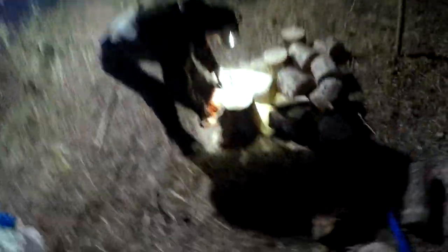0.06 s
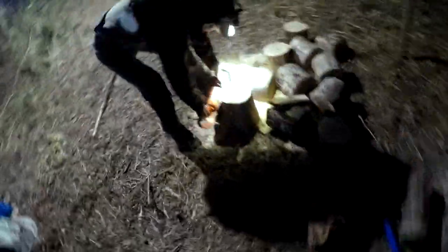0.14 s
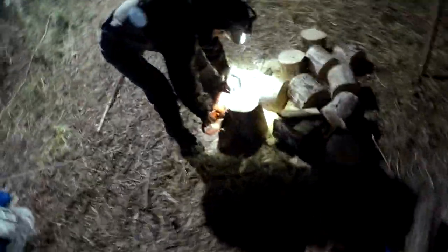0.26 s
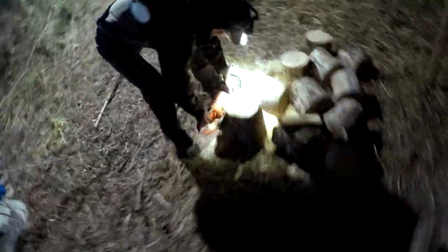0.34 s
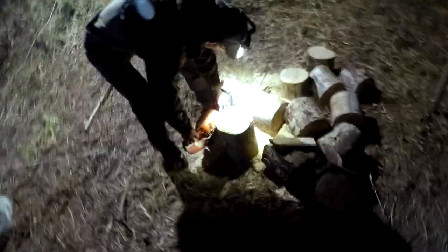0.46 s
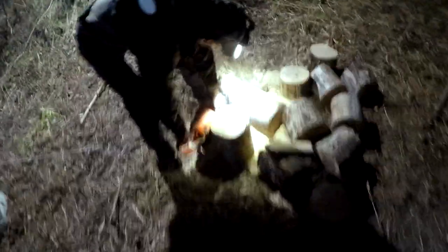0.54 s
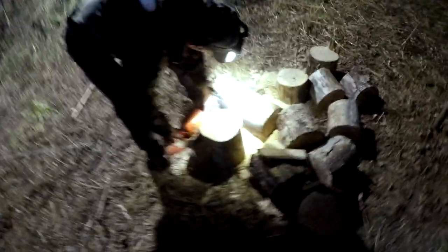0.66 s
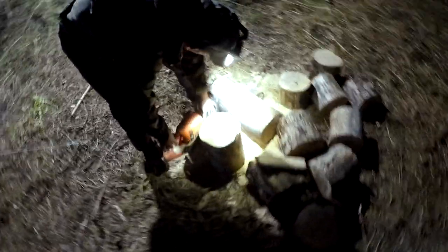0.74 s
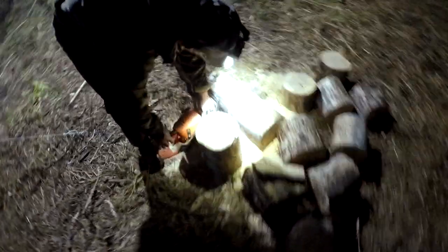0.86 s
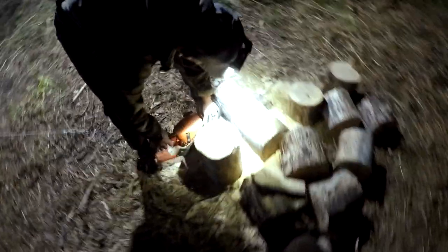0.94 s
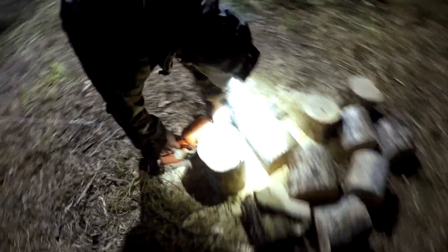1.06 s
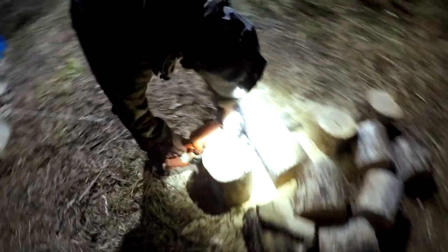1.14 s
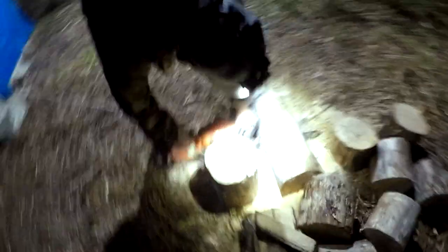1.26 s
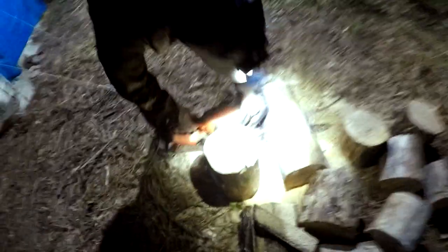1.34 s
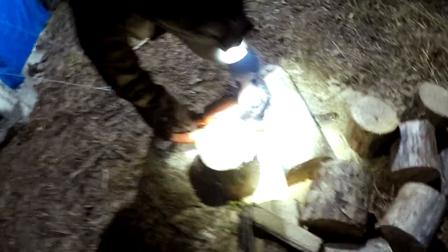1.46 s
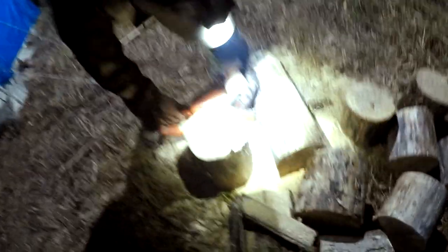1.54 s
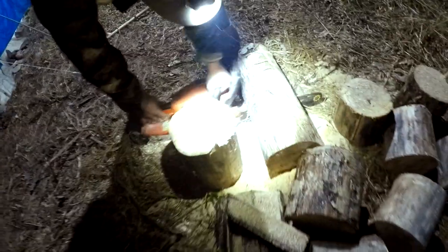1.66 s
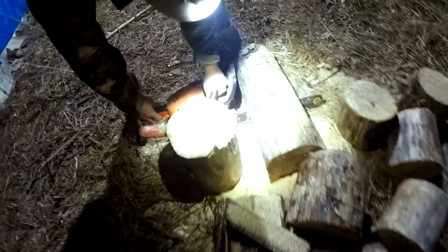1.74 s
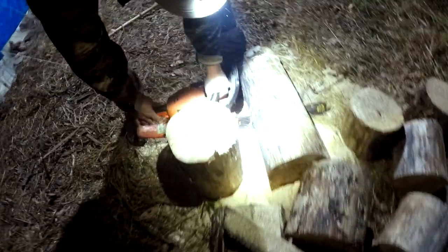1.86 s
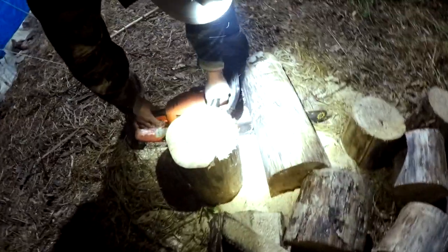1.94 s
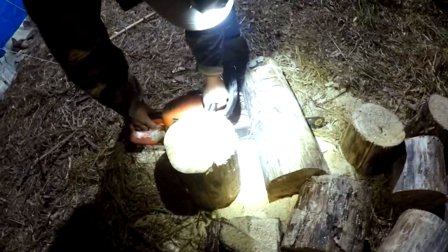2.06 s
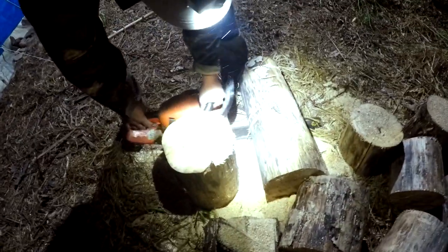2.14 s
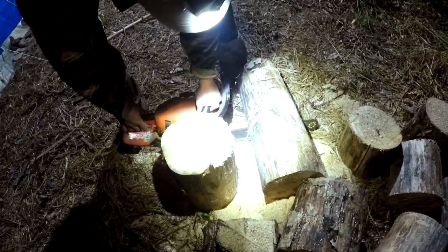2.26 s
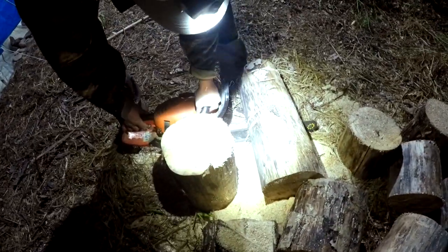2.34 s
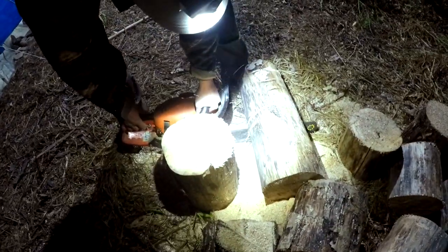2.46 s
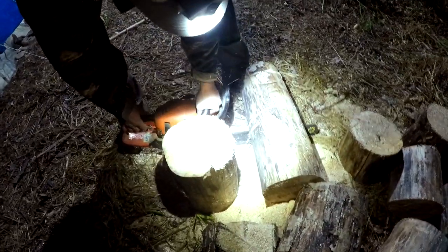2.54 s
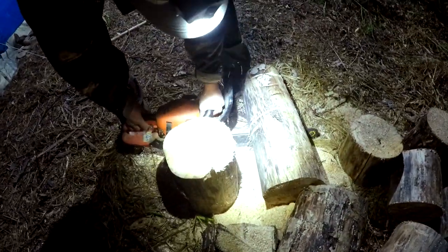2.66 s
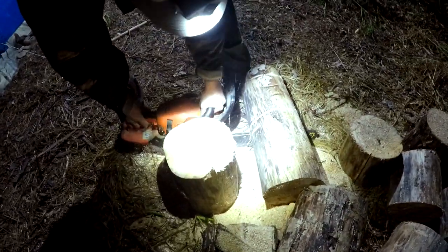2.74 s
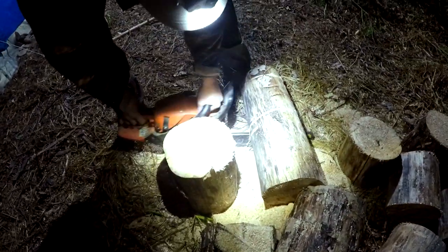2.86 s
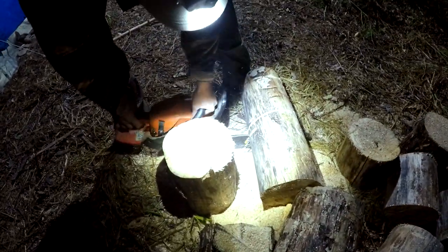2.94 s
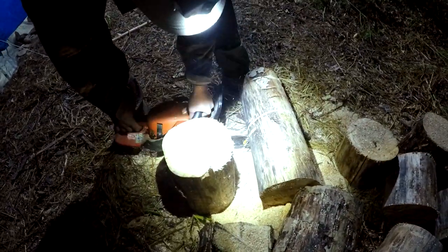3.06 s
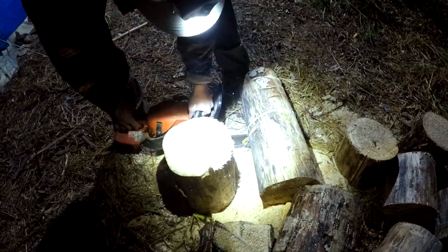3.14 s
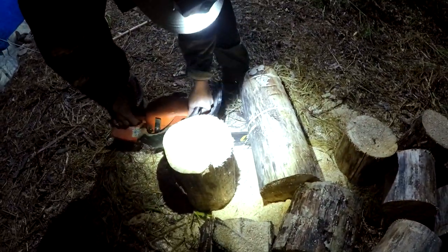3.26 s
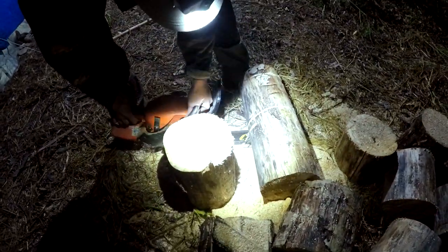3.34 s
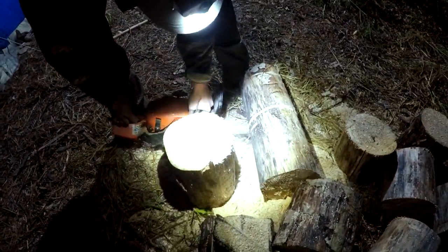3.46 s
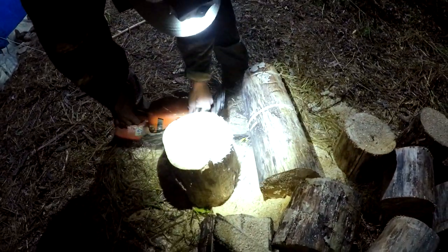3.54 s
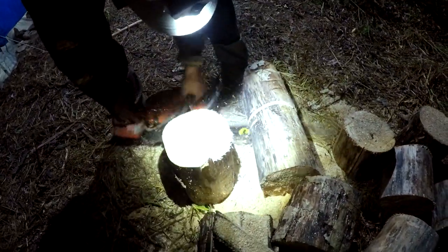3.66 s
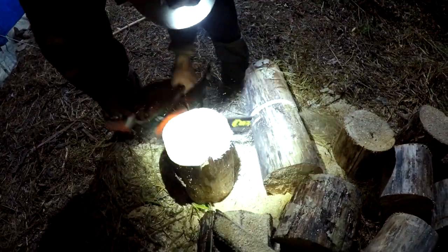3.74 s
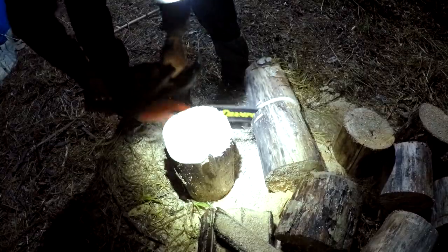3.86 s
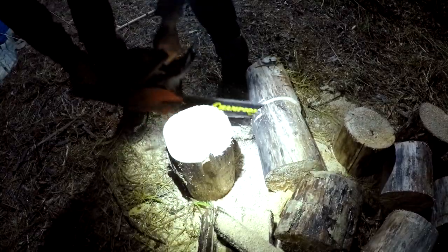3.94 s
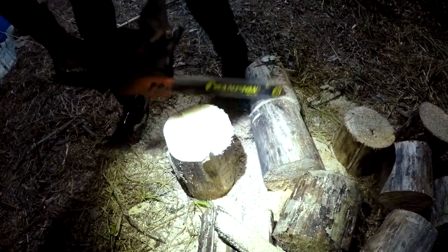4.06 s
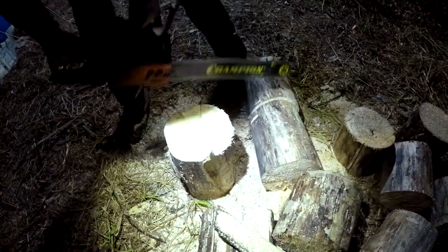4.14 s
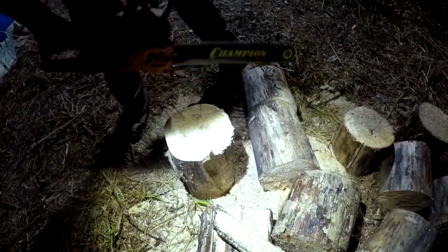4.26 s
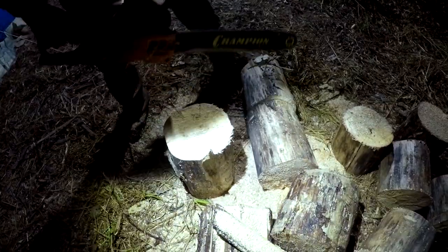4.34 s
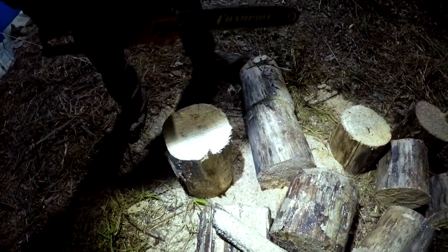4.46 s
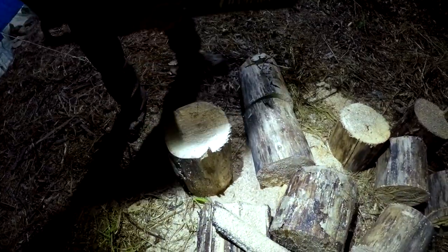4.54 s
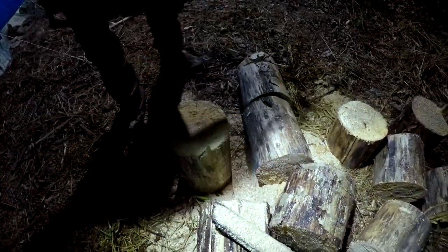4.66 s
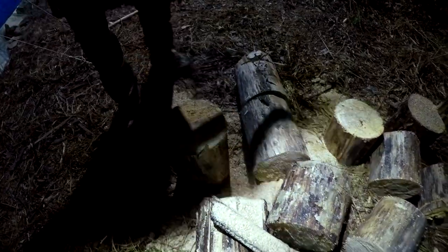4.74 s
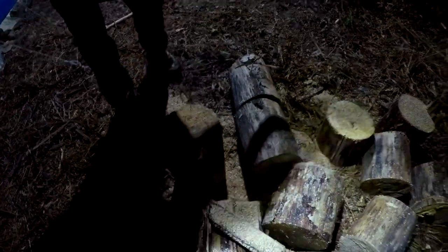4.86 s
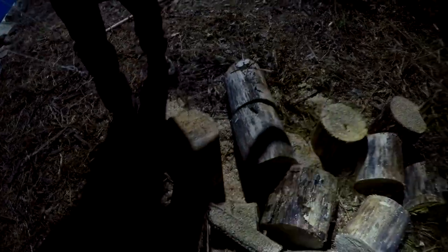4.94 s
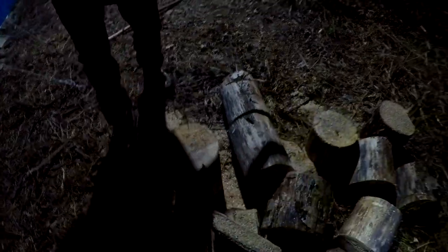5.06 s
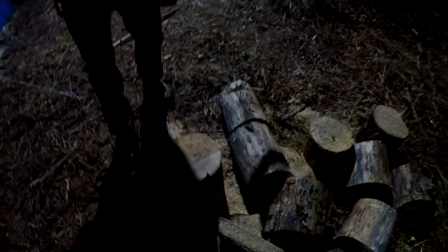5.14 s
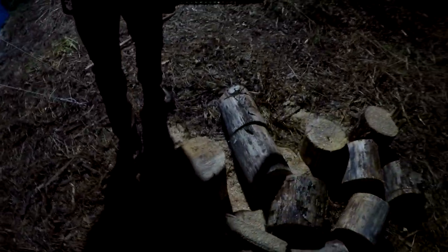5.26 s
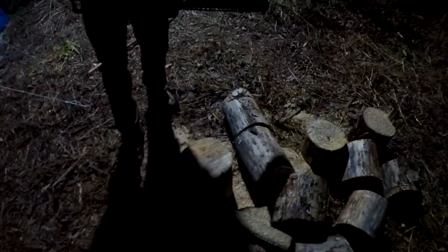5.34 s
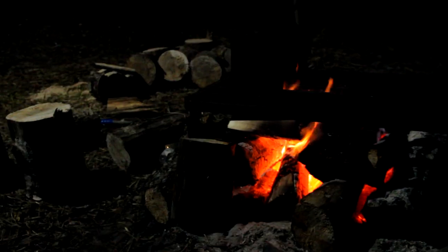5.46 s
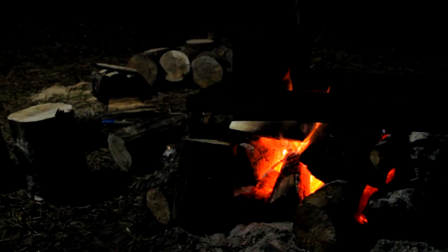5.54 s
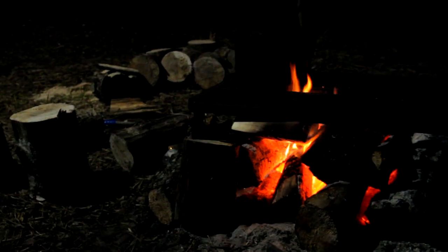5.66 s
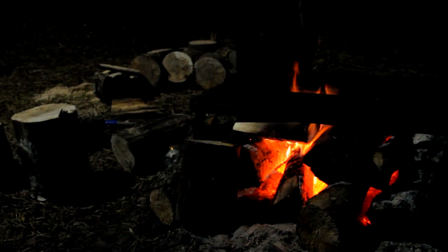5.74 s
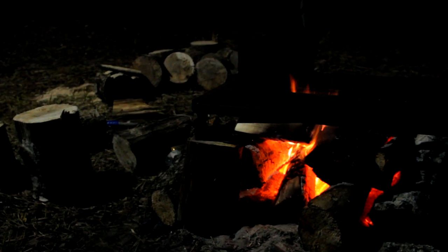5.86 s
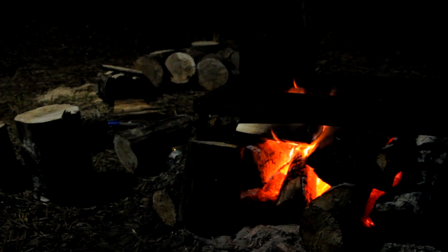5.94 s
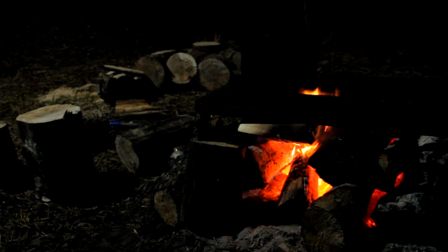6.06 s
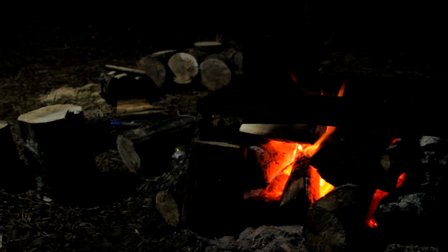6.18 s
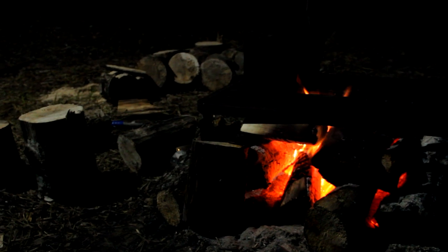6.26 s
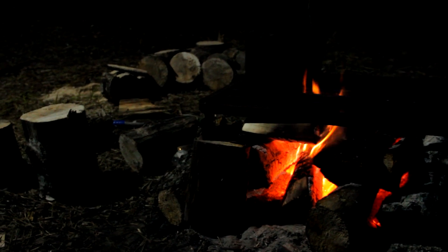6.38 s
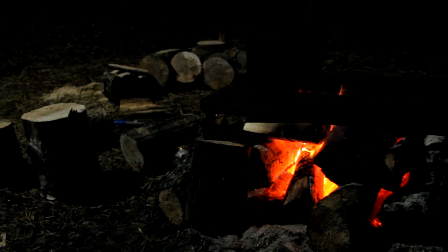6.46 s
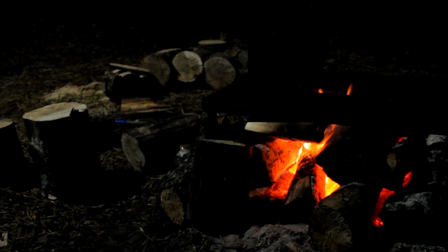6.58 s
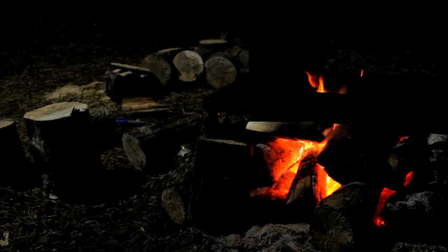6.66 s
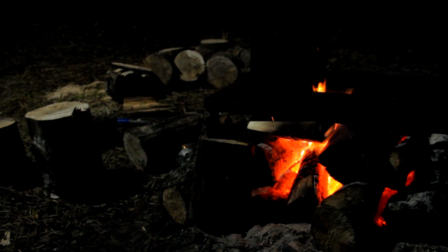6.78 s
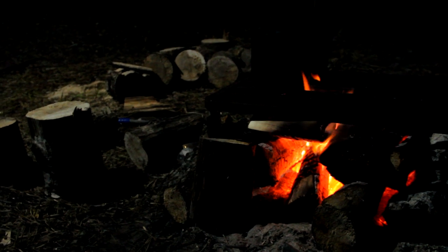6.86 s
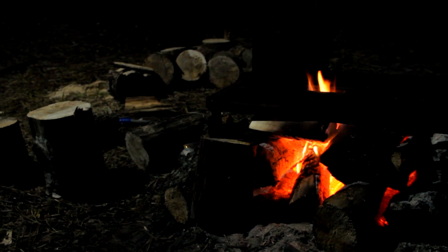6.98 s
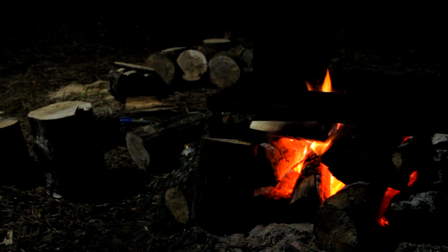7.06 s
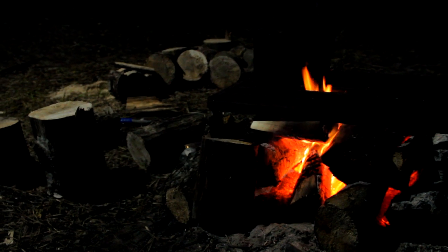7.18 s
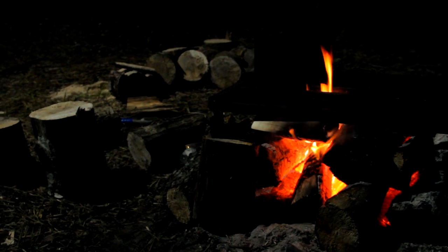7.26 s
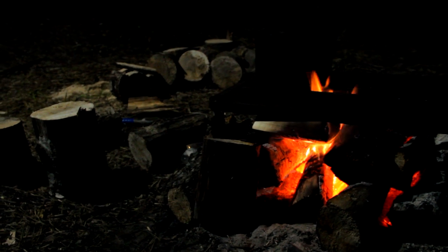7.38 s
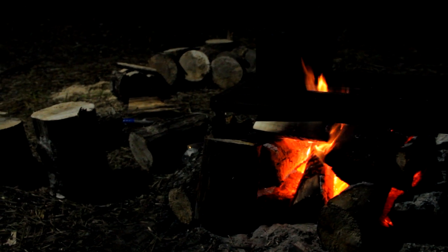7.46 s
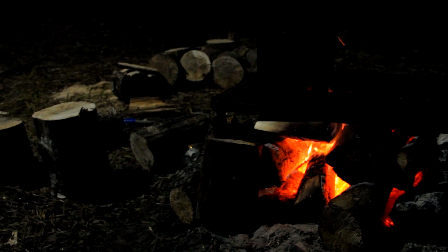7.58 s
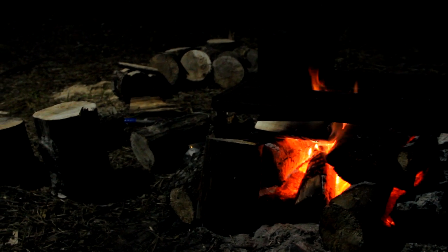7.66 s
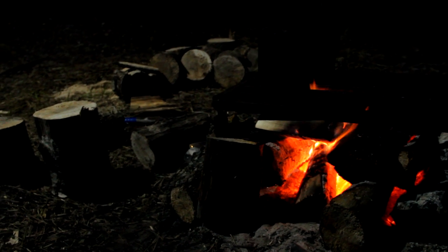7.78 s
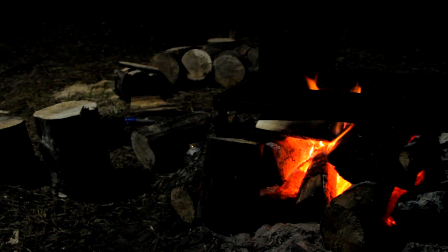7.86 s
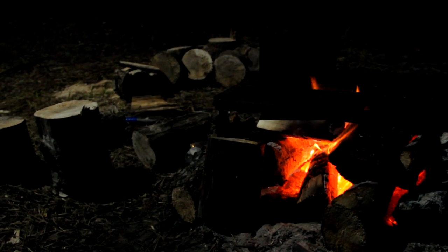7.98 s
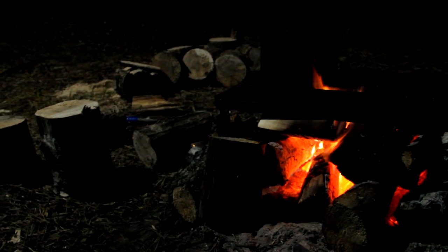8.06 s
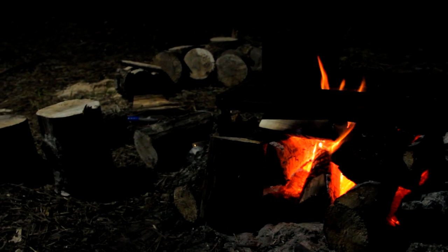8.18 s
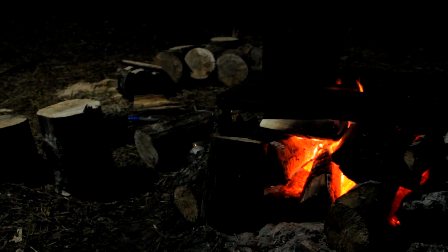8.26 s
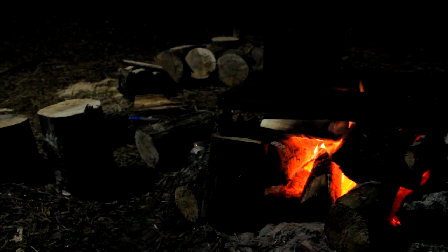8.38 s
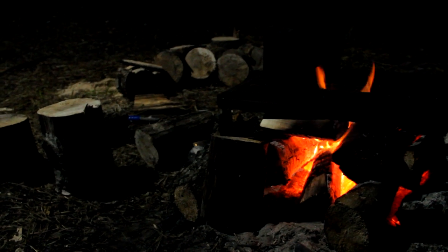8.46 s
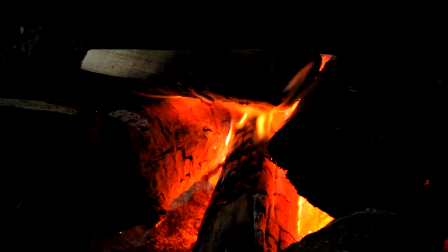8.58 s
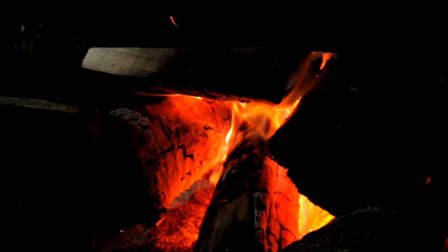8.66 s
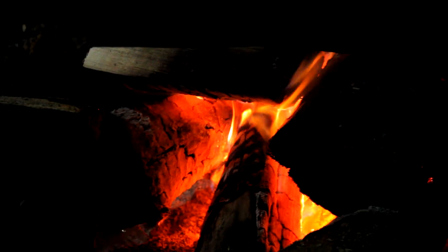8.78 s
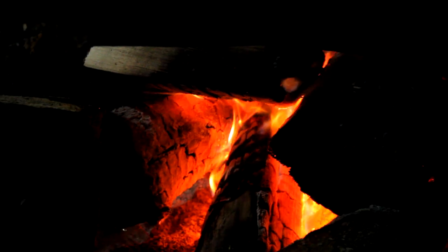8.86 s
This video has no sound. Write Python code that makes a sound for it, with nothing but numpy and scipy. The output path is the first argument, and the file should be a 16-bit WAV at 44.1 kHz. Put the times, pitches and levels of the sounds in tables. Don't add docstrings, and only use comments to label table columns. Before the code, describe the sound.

Loud two-stroke saw wavering under load, lifted and coasting down in pops and metallic rattles, then abruptly a hushed night hiss, low hum and few fire snaps.

```python
import sys
import numpy as np
from scipy import signal
from scipy.io import wavfile
from scipy.ndimage import uniform_filter1d

SR = 44100
rng = np.random.default_rng(int(sys.argv[2]) if len(sys.argv) > 2 else 0)


def invert_db(x):
    u = np.asarray(x, float) / 20
    return 10 ** u


def unload_audio(sound):
    columns = np.transpose(np.atleast_2d(sound))
    steps = np.round(np.clip(columns, -1, 1) * 32767)
    wavfile.write(sys.argv[1], SR, steps.astype(np.int16))


N = 393319

# time in seconds, crank turns in Hz.
CUTTING = [(0.0, 129.6), (0.1, 135.9), (0.23, 130.7), (0.42, 143.8), (0.55, 139.5), (0.75, 149.3),
           (1.06, 137.2), (1.2, 137.4), (1.38, 125.7), (1.75, 140.7), (1.96, 152.5), (2.15, 154.1),
           (2.51, 142.8), (2.74, 127.1), (2.92, 137.6), (3.19, 132.6), (3.37, 122.5), (3.55, 110.9)]
# time in seconds, crank turns in Hz.
LIFTED = [
    (3.62, 121),
    (3.7, 99.97),
    (3.75, 93.5),
    (3.88, 89.84),
    (4.11, 102.8),
    (4.58, 35.51),
]
# time in seconds, peak in dB.
MISSES = [
    (0.234, -22),
    (0.374, -29),
    (0.536, -21),
    (0.679, -18),
    (0.727, -16),
    (0.969, -13),
    (1.059, -31),
    (1.234, -21),
    (1.329, -28),
]
# frequency in Hz, level in dB.
MUFFLER = [(250, -8), (400, -9), (520, -4.5), (670, 0.5), (800, -8.5), (950, -15), (1070, -6.5),
           (1300, -16), (1700, -19.5), (2000, -23), (2600, -17), (3400, -59)]
# frequency in Hz, level in dB.
MUFFLER_FAR = [(250, 2.5), (450, -9), (650, -5), (800, -3), (1000, 1.5), (1150, -4.5), (1350, -10.5),
               (1700, -20), (2600, -8), (3400, -32)]
# frequency in Hz, level in dB.
MUFFLER_FREE = [(60, -17), (120, 7), (250, 0.5), (400, -2), (550, -2.5), (690, 4.5), (850, -9.5),
                (1000, -12), (1250, -7), (1500, -16.5), (2600, -21), (3400, -34)]
# frequency in Hz, change in dB.
THROTTLE_OPEN = [(200, 0.5), (330, -8.5), (470, 7), (580, 1.5), (720, -6), (1000, 3), (1300, 1.5)]
PORTS_DB = {3: -8, 4: 3, 6: 3, 7: 1, 8: 4}
# frequency in Hz, density in dB per Hz.
METAL = [(760, -27.5), (1300, 1.5), (1430, -8), (1650, -5), (1770, -8), (2010, -7), (2570, -2),
         (2910, -6.5), (3500, -9.5), (4120, -2.5), (5060, -4.5), (5490, 0.5), (6040, 0.5), (6510, -4),
         (7600, -22.5), (9880, -44), (16700, -120)]
# frequency in Hz, density in dB per Hz.
METAL_FREE = [(760, -24), (1300, 1), (1580, -30.5), (1800, -3), (2600, -3), (3130, -13.5), (3370, -6.5),
              (3680, -12), (4000, -1.5), (4670, 1), (5530, -0.5), (6370, -0.5), (7600, -20.5),
              (9880, -50.5), (16700, -120)]
# frequency in Hz, density in dB per Hz.
SHIMMER = [(4120, -25), (7000, -10), (7590, -13), (8310, -1.5), (8760, -2.5), (11200, -20), (12200, -7),
           (12800, -2.5), (14700, -16), (15600, -14)]
# frequency in Hz, density in dB per Hz.
RUMBLE = [(20, -15), (60, -1), (200, 2.5), (400, 0), (1000, 4), (1600, -25)]
# time in seconds, half length in seconds, level in dB.
GUSTS = [
    (0, .1, -21),
    (.47, 0.24, -24),
    (1.0, 0.36, -23),
    (1.53, .06, -36),
    (1.75, .08, -38),
    (2.86, .15, -44.5),
    (4.0, .25, -29.5),
    (4.48, .15, -31),
]
# time in seconds, peak in dB, ring centre in Hz, length in seconds.
CLANKS = [(4.5837, 14.5, 6340, 0.0036), (4.6168, 4, 6400, 0.0087), (4.634, -12.5, 5200, 0.033),
          (4.665, 4, 5170, 0.0076), (4.7265, -15.5, 5940, 0.025), (4.741, -8, 5948, 0.0082),
          (4.7894, -33, 4260, 0.01), (4.8244, -9.5, 4960, 0.018), (4.851, -17, 6063, 0.021),
          (4.8687, -11, 6501, 0.017), (4.9044, -41, 4600, 0.01), (4.954, -17.5, 3958, 0.025),
          (4.994, -14, 5140, 0.0058), (5.016, -25, 4430, 0.02063), (5.146, -33, 4635, 0.0077),
          (5.428, -39, 6100, 0.01), (5.442, -26, 5470, 0.0083)]
# time in seconds, peak in dB.
POPS = [
    (4.588, 5.5),
    (4.626, 3),
    (4.681, 1.5),
    (4.739, -4),
    (4.829, -14),
    (4.87, -18.5),
    (4.959, -21),
]
# time in seconds, level in dB, frequency in Hz, 60 dB decay in seconds.
PINGS = [
    (4.884, -25, 4560, 0.11),
    (5.031, -34.5, 4510, 0.36),
    (4.511, -7.5, 2610, .04),
    (4.533, -13, 2610, .04),
    (4.558, -5, 2560, 0.053),
    (4.734, -14, 6040, 0.08),
    (4.862, -14, 6050, 0.055),
]
# frequency in Hz, density in dB per Hz.
YARD_WIND = [(12, -43), (20, 1), (54, -3.5), (154, -8), (178, -10.5), (233, -12.5), (455, -24.5),
             (1500, -36), (1950, -44), (3300, -120)]
# frequency in Hz, density in dB per Hz.
YARD_RUSTLE = [(760, -34), (1300, -5), (1770, -7), (2070, -12), (2300, -7), (3190, -17), (3840, -12),
               (4170, -5), (4820, -10), (6110, -4), (7590, -21), (9320, -17), (11200, -32), (12800, -25),
               (15300, -32)]
# time in seconds, half length in seconds, level in dB.
RUSTLES = [
    (4.7, .06, -28),
    (4.9, 0.13, -49),
    (5.44, 0.089, -45.5),
]
# order, level in dB.
DRONE = [(1, -56), (2, -46), (3, -38), (4, -53), (6, -39), (7, -49), (8, -43), (9, -48), (10, -57),
         (11, -56), (12, -59)]
# time in seconds, half length in seconds, level in dB.
SWELLS = [
    (5.5, .12, -40),
    (6.2, .24, -33.5),
    (6.85, 0.14, -36),
    (7.5, .1, -46),
    (8.23, 0.15, -34),
    (8.66, 0.0375, -45),
    (8.92, .12, -44),
]
# frequency in Hz, density in dB per Hz.
NIGHT = [(4.7, -46), (8.0, -14), (27, -15), (59, -4.5), (112, -2), (145, -5), (212, -8), (330, -11.5),
         (500, -15), (1070, -15), (1730, -21), (3260, -14.5), (5260, -26), (14500, -34.5), (16000, -30)]
# frequency in Hz, side relative to mid in dB.
NIGHT_SIDE = [(60, -59), (110, -60), (200, -42.5), (380, -18), (700, -18), (1290, -19.5), (2380, -20),
              (4400, -20), (8120, -3.5), (15000, -3)]
# time in seconds, peak in dB, centre in Hz.
TICKS = [
    (6.336, -27, 9430),
    (6.4078, -17, 8240),
    (6.4597, -25, 8410),
    (8.109, -27, 7470),
    (8.6797, -30, 6980),
]

# far dB, close dB, free at 100 Hz dB, free dB per octave of speed
FIRST_DB = (-7.5, -7, -13, 12)
SECOND_DB = (-17, -20, -17.5, 5)
FIFTH_DB = (-30, -17, -26.5, 5)
BARK_DB = (-19, -20, -12, 4)
CHAIN_DB = (-19, -17.5, -15, -1)
SHIMMER_DB = (-14.5, -15, -15.5, 1)
APPROACH_S = (.6, 1.1)
LIFT_S, JOLT_S, SHUT_S = 3.58, (3.72, 3.8), 4.1
RELEASE_S = .05
LUG_HZ = 122
RUMBLE_DB, CALM_DB = -25.5, -69
SAW_END_S = CLANKS[0][0]
YARD_S, CHANGE_S = 4.7, 5.463
NIGHT_DB = -38


def evened(x):
    return x / np.sqrt(np.mean(x ** 2) + 1e-20)


def read(points, hz):
    f, value = np.transpose(points)
    return np.interp(np.log(hz + 1), np.log(f + 1), value)


def add(mix, s, sound):
    part = mix[round(s * SR):][:len(sound)]
    part += sound[:len(part)]


def ramp(t, start, stop):
    return np.clip((t - start) / (stop - start), 0, 1)


def bumps(rows, t, floor_db):
    return invert_db(floor_db) + sum(invert_db(db) * np.exp(-((t - s) / half) ** 2) for s, half, db in rows)


def drift(length, count):
    return np.interp(np.linspace(0, count - 1, length), np.arange(count), rng.standard_normal(count)) * 1.35


def colour(x, points):
    hz = abs(np.fft.fftfreq(8192, 1 / SR))
    log_gain = np.log(invert_db(np.maximum(read(points, hz), -100)))
    response = np.fft.ifft(np.exp(np.conj(signal.hilbert(log_gain)))).real[:3000]
    return signal.oaconvolve(x, response)[:len(x)]


def resonate(x, hz, width):
    r = np.exp(-np.pi * width / SR)
    return 2 * signal.lfilter([1 - r], [1, -r * np.exp(2j * np.pi * hz / SR)], x).real


def patchy(points, length, patchy_db, flicker_db):
    real, imaginary, patches = rng.standard_normal((length // 128 + 5, 257, 3)).T
    flicker = evened(uniform_filter1d(patches[0], size=6))
    patches = uniform_filter1d(patches, size=3, axis=0)
    patches = evened(uniform_filter1d(patches, size=50, axis=1))
    z = (real + 1j * imaginary) * invert_db(patchy_db * patches + flicker_db * flicker)
    noise = signal.istft(z, nperseg=512, noverlap=384)[1][:length]
    return evened(colour(noise, points))


def stance(t):
    lift, shut = ramp(t, LIFT_S, LIFT_S + .06), ramp(t, SHUT_S, SHUT_S + .06)
    jolt = lift - ramp(t, *JOLT_S)
    settle = lift * np.exp(-np.maximum(t - JOLT_S[0], 0) / .14)
    rough = .15 + (.6 - .15) * settle
    rough += (.06 - rough) * shut
    return 1 - ramp(t, *APPROACH_S) + jolt / 2, lift - jolt / 2, rough


def level(row, t, hz, close_db=0):
    far_db, near_db, free_db, per_octave_db = row
    near, lift = ramp(t, *APPROACH_S), ramp(t, LIFT_S + 0.02, LIFT_S + 0.07)
    cutting = (1 - near) * far_db + near * (near_db + close_db)
    return (1 - lift) * cutting + lift * (free_db + per_octave_db * np.log2(hz / 100))


def uneven_firing(t):
    miss = sum(invert_db(db) * np.exp(-((t - s - .02) / 0.0095) ** 2) for s, db in MISSES)
    start, attack = 3.62, .08
    stutter = ramp(t, start, start + attack) ** 2 * (1 - ramp(t, SHUT_S, SHUT_S + RELEASE_S))
    stutter = np.sqrt(2) * stutter * invert_db(-15 - 18 * (t - start - attack))
    return miss, stutter


def crank_orders(t, hz, angle, miss, half):
    far, free, _ = stance(t)
    notch_db = -9 * np.exp(-((2 * hz - 250) / 12) ** 2)
    fifth_peak_db, sixth_peak_db = (-10 * np.log10(1 + ((k * hz - 655) / 68) ** 4) for k in (5, 6))
    first_db = level(FIRST_DB, t, hz) + .7 * drift(len(hz), count=50)
    second_db = level(SECOND_DB, t, hz, notch_db) + 1.6 * drift(len(hz), count=40)
    fifth_db = level(FIFTH_DB, t, hz, fifth_peak_db) + (.9 + 3 * (far + free)) * drift(len(hz), count=50)
    orders = invert_db(first_db) * np.cos(angle + 0.66)
    orders += invert_db(second_db) * np.cos(2 * angle + .5)
    orders += invert_db(fifth_db) * np.cos(5 * angle)
    close = np.clip(1 - 2 * (far + free), 0, 1)
    orders -= close * invert_db(FIFTH_DB[1] - 2.5 + sixth_peak_db) * np.cos(6 * angle)
    labour = np.clip((LUG_HZ - hz) / 10, 0, 1)
    orders -= close * labour * invert_db(-22) * np.cos(3 * angle)
    halves = miss * np.cos(angle / 2)
    halves += half * (np.cos(3 * angle / 2) + .5 * np.cos(5 * angle / 2))
    return np.sqrt(2) * orders + halves


def exhaust(hz, angle, uneven):
    far, free, rough = stance(np.arange(len(hz)) / SR)
    shares, pipes = (far, 1 - far - free, free), (MUFFLER_FAR, MUFFLER, MUFFLER_FREE)
    step = np.arange(0, len(hz), 100)
    throttle = free[step] * (1 - ramp(step / SR, SHUT_S, SHUT_S + .04))
    lines = np.zeros(len(hz))
    for k in [3, 4] + list(range(6, 34)) + list(np.arange(1.5, 14)):
        order_hz = k * hz[step]
        db = sum(share[step] * read(pipe, order_hz) for share, pipe in zip(shares, pipes))
        db += free[step] * PORTS_DB.get(k, 0) + 2.4 * drift(len(step), count=24)
        db += throttle * read(THROTTLE_OPEN, order_hz)
        size = invert_db(db) * (uneven[step] if k % 1 else 1)
        wave = -np.cos(k * angle + 0.8 * rng.standard_normal())
        lines += np.interp(np.arange(len(hz)), step, size) * wave
    lines /= np.sqrt(uniform_filter1d(lines ** 2, size=5000) + 1e-9)
    turn = angle / (2 * np.pi) % 1
    puffs = rng.standard_normal(len(hz)) * (.5 + np.exp(-turn / 0.4))
    puffs = sum(share * evened(colour(puffs, pipe)) for share, pipe in zip(shares, pipes))
    return np.sqrt(1 - rough) * lines + np.sqrt(rough) * puffs


def chain_noise(t, hz):
    free = stance(t)[1]
    chain = np.sqrt(1 - free) * patchy(METAL, len(hz), 1.9, .7)
    chain += np.sqrt(free) * patchy(METAL_FREE, len(hz), 1.3, .7)
    chain += invert_db(level(SHIMMER_DB, t, hz)) * patchy(SHIMMER, len(hz), 0.711, 0.99)
    lug_db = -2.5 * np.maximum(LUG_HZ - hz, 0) / 10
    return invert_db(level(CHAIN_DB, t, hz, lug_db)) * chain


def wind_and_steps(t):
    rumble = invert_db(RUMBLE_DB) * patchy(RUMBLE, len(t), 2.5, 1.5)
    thump = patchy([(10, -2), (30, -17), (80, 2), (200, -41)], len(t), 1.0, 1.39)
    return rumble + bumps(GUSTS, t, CALM_DB) * thump


def kerf_scrape(t):
    rasp = resonate(rng.standard_normal(len(t)), 1150, 500)
    rasp = evened(resonate(rasp, 1150, 500))
    return bumps([(3.685, .03, -17)], t, -120) * rasp


def saw():
    t = np.arange(round(SAW_END_S * SR)) / SR
    hz = np.interp(t, *np.transpose(CUTTING + LIFTED))
    turns = np.cumsum(hz * (1 + .003 * drift(len(hz), count=300))) / SR
    turns += 1000 - turns[-1]
    angle = 2 * np.pi * turns
    miss, stutter = uneven_firing(t)
    half = miss + stutter
    strength = 1 + 0.2 * np.interp(turns, np.arange(1001), rng.standard_normal(1001))
    bark = strength * exhaust(hz, angle, np.clip(0.08 + 5 * half, 0, .9))
    lug_db = 2 * np.maximum(LUG_HZ - hz, 0) / 10
    bark *= invert_db(level(BARK_DB, t, hz, lug_db) + 1.5 * ramp(t, SHUT_S, SHUT_S + RELEASE_S))
    pulsing = np.clip(np.maximum(0.21 + 1.7 * stutter, (72 - hz) / 42), 0, 1)
    gate = 1 - pulsing + 1.8176 * pulsing * strength * np.exp(-(turns % 1) / 0.49)
    out = crank_orders(t, hz, angle, miss, half) + bark
    out += gate * (chain_noise(t, hz) + kerf_scrape(t)) + wind_and_steps(t)
    return out * np.clip((SAW_END_S - t) / 0.005083, 0, 1)


def pings():
    out, t = np.zeros(N), np.arange(SR // 2) / SR
    for s, db, hz, t60 in PINGS:
        add(out, s, invert_db(db - 60 * t / t60) * np.minimum(t / 0.0031, 1) * np.sin(2 * np.pi * hz * t))
    return out


def clanks():
    out, t = np.zeros(N), np.arange(5000) / SR
    wide = METAL_FREE[:-2] + [(f, db - 24.5) for f, db in SHIMMER[2:]]
    for s, db, hz, length in CLANKS:
        noise = rng.standard_normal(len(t))
        rattle = evened(colour(noise, wide)) + 0.69 * evened(resonate(noise, hz, 130))
        decay = np.exp(-(t / abs(length)) ** 3) + .2 * np.exp(-t / .02)
        add(out, s, invert_db(db - 8.5) * rattle * np.minimum(t / .006, 1) ** 1.5 * decay)
    return out


def pops():
    out, t = np.zeros(N), np.arange(5000) / SR
    for s, db in POPS:
        push = np.exp(-t / 0.006062) * np.cos(2 * np.pi * 105 * t)
        push += 0.68 * np.exp(-t / 0.0038) * np.cos(2 * np.pi * 680 * t)
        tail = evened(resonate(rng.standard_normal(len(t)), 267.8, 190))
        push += 0.22 * np.exp(-t / 0.02981) * tail
        add(out, s, invert_db(db - 4.5) * np.minimum(t / 0.00098, 1) * push)
    return out


def yard():
    t = np.arange(round(CHANGE_S * SR)) / SR
    out = invert_db(-26) * patchy(YARD_WIND, len(t), 1.0964, 1.229)
    out += bumps(RUSTLES, t, -46.5) * patchy(YARD_RUSTLE, len(t), 1.3, 0.6)
    return out * np.clip((t - YARD_S) / 0.014, 0, 1) * np.clip((CHANGE_S - t) / 0.0042, 0, 1)


def generator(t):
    hz = 25.03 - .33 * np.cos(2 * np.pi * (t - 6.05) / 1.8)
    angle = 2 * np.pi * np.cumsum(hz) / SR
    drone = bumps(SWELLS, t, -54) * np.cos(5 * angle)
    drone += invert_db(-47.5) * np.exp(-((t - 8.2) / 0.1) ** 2) * np.cos(15 * angle)
    for k, db in DRONE:
        waver = drift(len(t), count=16)
        phase = .15 * k ** 2 * (k % 2) + .2 * waver
        drone += invert_db(db + 1.3 * waver) * np.cos(k * angle + phase)
    return np.sqrt(2) * drone


def fire_ticks(length):
    out, t = np.zeros(length), np.arange(600) / SR
    for s, db, tick_hz in TICKS:
        burst = rng.standard_normal(len(t)) * np.exp(-t / 0.00073)
        snap = .6 * resonate(burst, 12600, 5980)
        snap += 1.27 * resonate(snap, tick_hz, 2500)
        snap += 0
        snap = .6 * resonate(burst, 12600, 5980) + 1.27 * resonate(burst, tick_hz, 2500)
        snap += 1.037 * resonate(burst, 3683, 700)
        add(out, s - CHANGE_S, invert_db(db + 2.5) * snap / abs(snap).max())
    return out


def camp():
    start = round(CHANGE_S * SR)
    t = np.arange(start, N) / SR
    hiss = patchy(NIGHT, len(t), 0.72, 0.68)
    mid = generator(t) + invert_db(NIGHT_DB) * hiss + fire_ticks(len(t))
    side = invert_db(NIGHT_DB) * colour(np.roll(hiss, SR), NIGHT_SIDE)
    both = np.array([mid, side]) * np.clip((t - CHANGE_S) / 0.011, 0, 1)
    both = signal.oaconvolve(both, signal.firwin(301, 15750, fs=SR)[None], "same")
    return np.pad(both, ((0, 0), (start, 0)))


def top_side(mid):
    _, _, z = signal.stft(mid, SR, nperseg=256)
    z *= np.exp(2j * np.pi * rng.random(z.shape))
    side = signal.istft(z, SR, nperseg=256)[1][:N]
    band = signal.firwin(601, [11700, 15350], pass_zero=False, fs=SR, window=("kaiser", 9))
    return invert_db(-3.5) * signal.oaconvolve(side, band, "same")


def scene():
    mid = pings() + clanks() + pops()
    add(mid, 0, saw())
    add(mid, 0, yard())
    mid = np.clip(np.tanh(mid / 1.402) * 1.268, -.93, .93)
    mid = signal.oaconvolve(mid, signal.firwin(301, 15350, fs=SR), "same")
    far_mid, far_side = camp()
    side = top_side(mid) + far_side
    mid = mid + far_mid
    return np.array([mid + side, mid - side])


def roll_off(x):
    return signal.sosfilt(signal.butter(12, 16460, fs=SR, output="sos"), x)


def record(dry):
    return roll_off(dry)


dry = scene()
out = record(dry)
unload_audio(out)
```